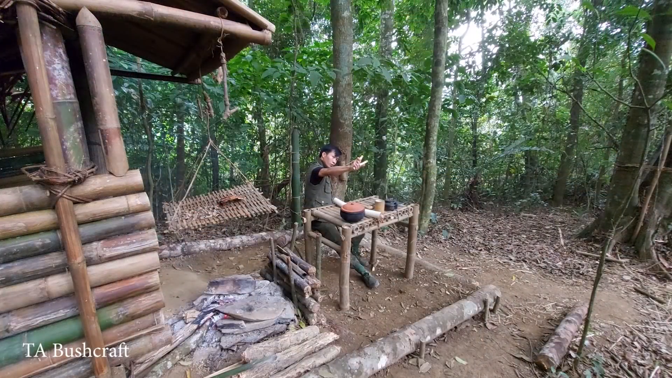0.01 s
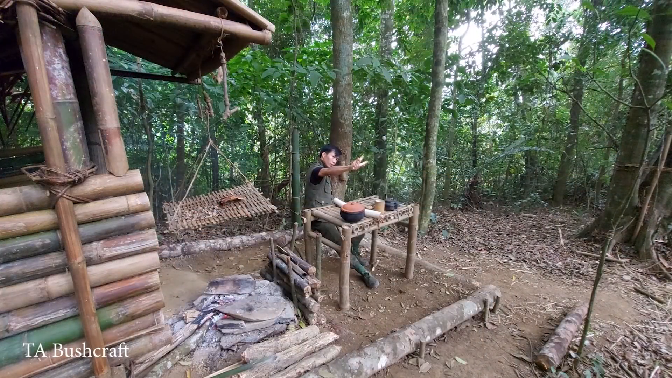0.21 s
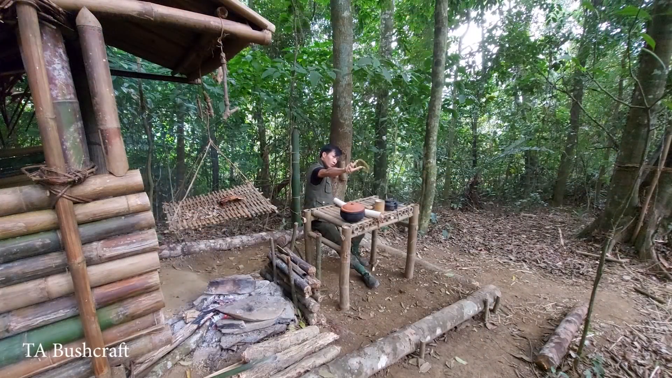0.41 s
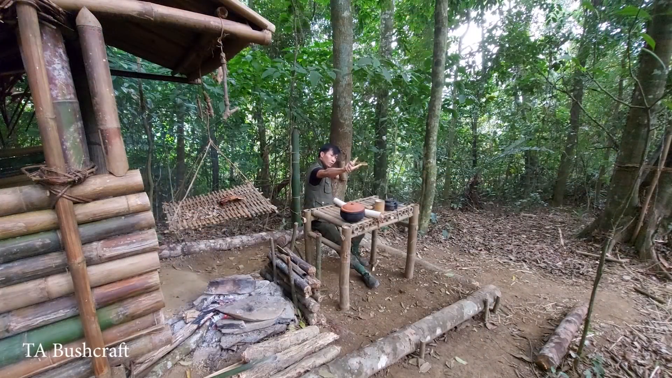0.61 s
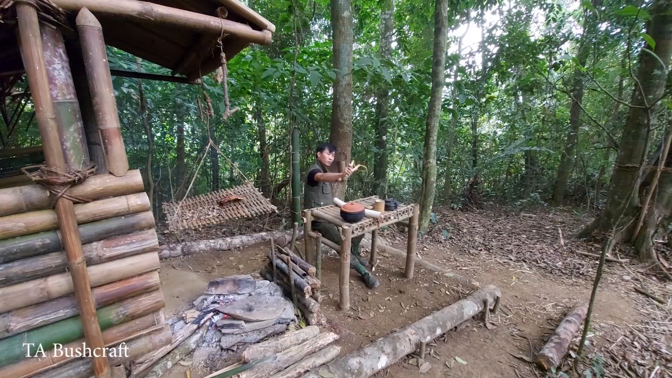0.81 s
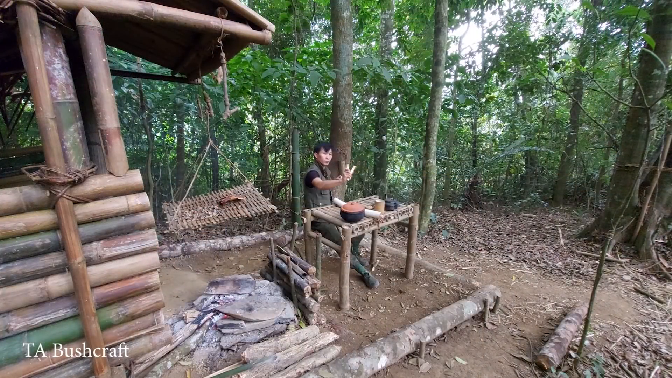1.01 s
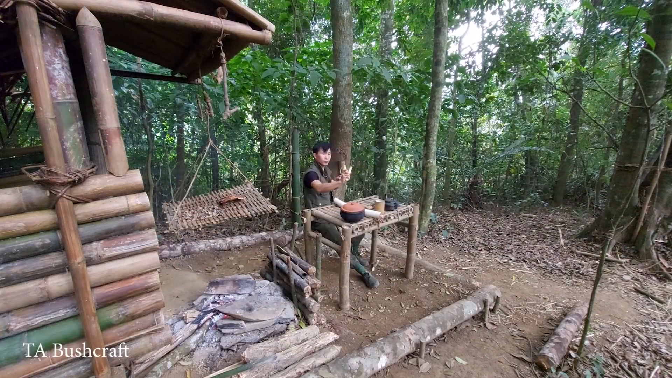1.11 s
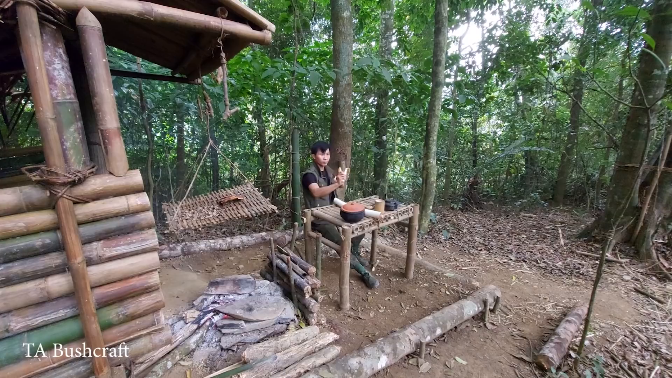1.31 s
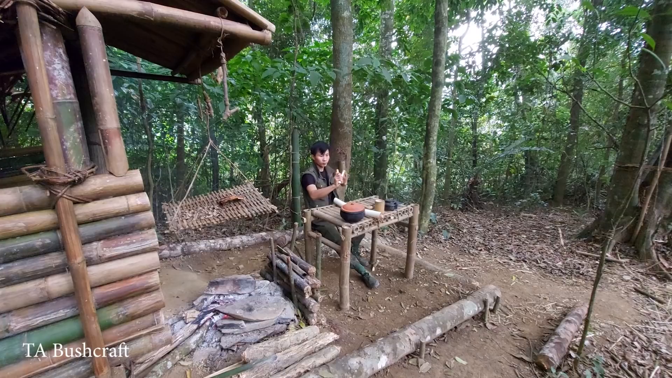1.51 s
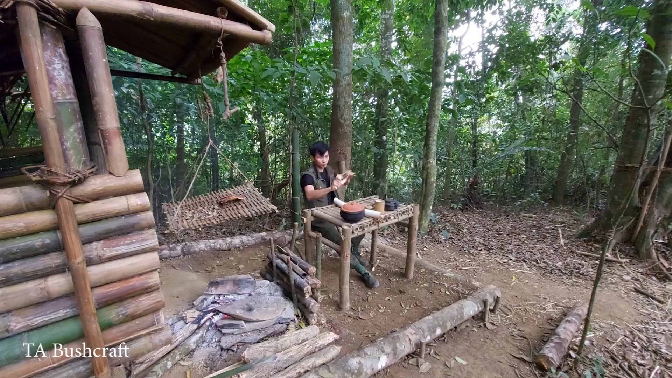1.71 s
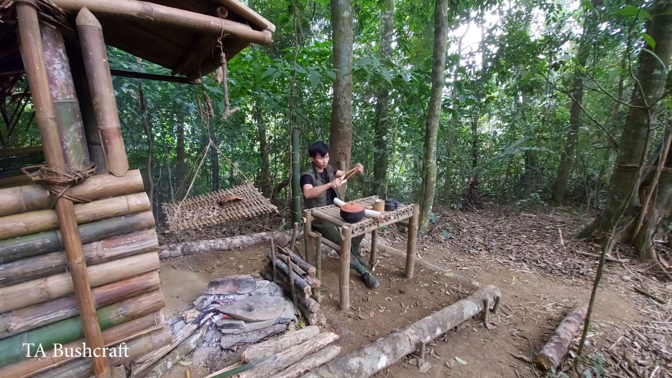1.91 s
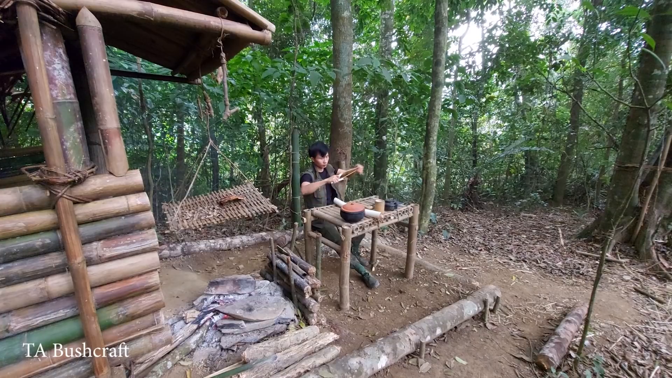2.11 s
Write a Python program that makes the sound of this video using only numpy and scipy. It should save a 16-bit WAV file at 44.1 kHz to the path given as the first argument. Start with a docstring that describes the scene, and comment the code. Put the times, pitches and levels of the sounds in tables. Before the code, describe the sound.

A slingshot's bands whip forward and slap with one very loud, dry crack close to the microphone, then a bright scatter off trees fades into quiet forest with thin insect drone, faint bird hoots and tiny pellet clinks.

```python
"""One slingshot shot in a forest camp: the bands whip forward, slap with a crack and flap slack.
Shaped noise bursts make the rush and crack, damped sines the flap, slowly fading noise the trees' answer.
Afterwards the next pellet is picked up with a few faint clinks: short noise bursts at narrow resonances.
Insects drone near 5 kHz as narrow noise, one rasps briefly, and a far bird repeats three gliding-sine hoots.
"""
import sys
import numpy as np
from scipy import signal
from scipy.fft import rfft, irfft, next_fast_len
from scipy.io import wavfile
from scipy.ndimage import map_coordinates

SR = 44100
rng = np.random.default_rng(int(sys.argv[2]) if len(sys.argv) > 2 else 0)


def wav_record(signal):
    """Record a signal, one row per channel, as 16-bit PCM in the file named by sys.argv[1]."""
    frames = np.transpose(np.atleast_2d(signal))
    bounded = np.clip(frames, -1, 1)
    # unit amplitude maps onto the largest positive 16-bit level
    quanta = np.round(bounded * 32767).astype(np.int16)
    wavfile.write(sys.argv[1], SR, quanta)


N = 97020

# Spectrum of the quiet air: columns f/Hz, relative level/dB
AIR_SPECTRUM = [(20, -29.5), (40, -4), (65, -1), (140, -1.5), (200, -6), (320, -4.5), (600, -9.5),
                (1100, -14), (2000, -16.5), (3400, -20), (4400, -13.5), (6000, -17.5), (7400, -23.5),
                (10500, -11), (13000, -13.5), (15800, -17.5)]
# Left-right likeness of the air: columns f/Hz, correlation/1
AIR_LIKENESS = [(60, .2), (300, 0.35), (1200, 0.0072)]
# Stereo balance of the air: columns f/Hz, left minus right/dB
AIR_BALANCE = [(2000, 1), (5000, 0), (10000, 2.5), (15000, 3.5)]
# Loudness contour of the rasping insect: columns t/s, level/dB
RASP_CONTOUR = [(1.368, -89.5), (1.405, -64.5), (1.441, -59), (1.53, -61.5), (1.65, -69.5), (1.78, -77),
                (1.9, -96)]
# Spectrum of the rasp: columns f/Hz, relative level/dB
RASP_SPECTRUM = [(4500, -51.5), (5400, -8), (6000, -0.5), (6800, -0.5), (7200, -36.5), (9000, -59.5)]
# Phrases of the bird: columns t/s, level relative to the notes/dB
BIRD_PHRASES = [(0.12, 0.5), (.767, 0.5), (1.412, 0), (2.073, 0)]
# Notes of a phrase: columns delay t/s, length t/s, start f/Hz, end f/Hz, level/dB
HOOT_NOTES = [(0, 0.039, 837, 765, -61), (.072, .046, 932.4, 776.2, -54.5), (.148, .05, 930, 773, -54)]
# Colour of the hoots' echo: columns f/Hz, gain level/dB
HOOT_ECHO_COLOUR = [(750, -2.5), (820, 0), (900, 5.5)]
# Spectrum of the bands rushing forward: columns f/Hz, relative level/dB
WHIP_SPECTRUM = [(100, -10.5), (300, 1), (480, -6.5), (780, 8), (1200, -7.5), (1900, -21), (2800, -7.5),
                 (3800, -14.5), (5000, -6), (7300, -18), (11000, -2.5), (15500, -11)]
# Spectrum of the crack: columns f/Hz, relative level/dB
CRACK_SPECTRUM = [(150, -27.5), (330, -8.5), (490, -9.5), (700, 0.5), (950, -7.5), (1170, -1.5),
                  (1650, -21), (2250, -6.5), (2730, 2), (3500, -13.5), (4200, -6), (4650, -6.5),
                  (5150, -0.5), (6000, 2), (7400, -14), (8600, -5), (11000, -6.5), (15000, -8.5)]
# Left-right likeness of the direct shot: columns f/Hz, correlation/1
CRACK_LIKENESS = [(400, .98), (1500, 1), (5000, 0.64), (11000, .55)]
# Treble snaps, the slap then its first returns from nearby surfaces: columns delay after slap t/s, level/dB
SLAP_SNAPS = [(.0003, -2), (.0034, -8), (.0094, -13.5), (.014, -17)]
# Spectrum of each snap: columns f/Hz, relative level/dB
SNAP_SPECTRUM = [(2000, -25), (4200, -6), (5600, 1.5), (7400, -10), (9000, -2), (11000, 0), (15000, -1)]
# Modes of flapping bands, pouch and wooden fork: columns delay after slap t/s, f/Hz, level/dB, T60 t/s
FLAP_MODES = [(0.0017, 90, -13, .06), (.0025, 125, -25, 0.11), (.002, 315, -15, 0.039),
              (.0005, 630, -14, 0.02), (0.00098, 790, -12.5, .025), (0.0011, 1170, -19.5, .025)]
# Starting spectrum of the crack scattered by ground, hut and trees: columns f/Hz, relative level/dB
SCATTER_SPECTRUM = [(35, -40.5), (70, -12.5), (120, -9), (180, -18), (250, -10.5), (315, -3.5),
                    (380, -14.5), (440, -10.5), (520, -13.5), (660, -8), (850, -9), (950, -15),
                    (1150, -11.5), (1500, -14), (1950, -9), (2300, -11), (2700, 0.5), (3250, -11.5),
                    (4100, -5), (6000, -8), (7200, -10), (9000, -3.5), (10700, 0), (13200, -2), (15500, -7)]
# Decay of the scattered crack: columns f/Hz, T60 t/s
SCATTER_DECAY = [(80, .2), (300, .26), (900, 0.32), (2500, .34), (5000, 0.41), (10000, .35), (15500, .32)]
# Left-right likeness of the diffuse forest: columns f/Hz, correlation/1
FOREST_LIKENESS = [(80, .95), (400, 0.56), (900, .45), (2000, 0.061), (8000, 0.095)]
# Spectrum of the answer from more distant trees: columns f/Hz, relative level/dB
LATE_SPECTRUM = [(1500, -22.5), (2300, -15), (2750, -3), (3300, -7.5), (4200, -1), (6000, 0), (7500, -4.5),
                 (10000, 0), (13000, -4), (15500, -8)]
# Pellet clinks: columns t/s, level/dB, ring f/Hz, click relative to ring level/dB, echo level/dB
PELLET_CLINKS = [(1.408, -56.5, 10900, -4, -18), (1.565, -58, 9830, 4, 3.5), (1.696, -66, 10160, -4, -16),
                 (1.963, -54, 9730, -3.5, 2.5), (2.193, -45.5, 9690, -12.5, 7)]
# Spectrum of jostled pellets, also of each click: columns f/Hz, relative level/dB
RATTLE_SPECTRUM = [(2000, -15.5), (3500, -11), (6000, -2), (8000, -7.5), (9800, -2.5), (12000, -3),
                   (15500, -4.5)]
# Narrow rings within the rattle: columns f/Hz, level relative to the rattle/dB
RATTLE_RESONANCES = [(3780, -5), (9850, -13)]

# Resonance widths are taken between the half-amplitude points; T60 is the time to fall by 60 dB.
AIR_DB = -63
DRONE_HZ, DRONE_WIDTH_HZ, DRONE_DB = 5099, 580, -64
DRONE_FLUTTER_DB, INSECT_PAN_DB = 0.5, -1  # pan: left minus right
HOOT_FALL, HOOT_PEAK_LATE = 2.3, 1.3  # exponents: glide curvature, delay of the loudness peak
HOOT_WET_DB, HOOT_ROOM_T60_S = -3.5, 0.5

SHOT_S = 0.2461  # the bands slap
PORT_LAG_S = 0.000045  # the direct sound reaches the right microphone port first
WHIP_LEAD_S, WHIP_RISE_S, WHIP_DB = 0.0062, 0.0026, -20
CRACK_DB, CRACK_RISE_S, CRACK_HOLD_S, CRACK_T60_S = -2.5, 0.00089, 0.0014, 0.027
SNAP_RISE_S, SNAP_HOLD_S, SNAP_T60_S = 0.00027, 0.0008, 0.012
FLAP_RISE_S = 0.001
SCATTER_DB, SCATTER_RISE_S = -9.5, 0.005
RING_HZ, RING_WIDTH_HZ, RING_DB, RING_T60_S = 2640, 280, -28.5, 0.45  # the slap's strongest resonance
LATE_DB, LATE_RISE_S, LATE_T60_S = -40.5, 0.12, 0.834

RATTLE_S, RATTLE_DB, RATTLE_RISE_S, RATTLE_T60_S = 1.563, -57.5, 0.0092, 0.336
CLINK_WIDTH_HZ, CLINK_RISE_S, CLINK_T60_S = 230, 0.001, 0.069
CLINK_PAN_DB, CLINK_ROOM_T60_S = 6, 0.41

LOW_CUT_HZ, CLIP_TOP = 38, 1.05
TOP_HZ, TOP_SLOPE_HZ = 16100, 500  # upper band limit and the width of its slope


def amp(db):
    """Level: an amplitude ratio is ten to the power of decibels over twenty."""
    return 10 ** (np.asarray(db) / 20)


def pan(db):
    """Level difference: the two channels' gains differ by db, left minus right."""
    return amp([[db / 2], [-db / 2]])


def unit(x):
    """Normalisation: division by the root mean square gives unit power."""
    return x / np.sqrt(np.mean(x ** 2) + 1e-20)


def along(points, hz):
    """Logarithmic frequency scale: (f, value) points are interpolated along log f."""
    f, value = np.transpose(points)
    return np.interp(np.log(hz + 1), np.log(f + 1), value)


def since(s):
    """Causality: seconds elapsed since s, zero before it."""
    return np.maximum(np.arange(N) / SR - s, 0)


def burst(s, rise, t60, hold=0):
    """Exponential damping: an envelope with linear rise, hold, then constant loss in dB per second."""
    attack = np.minimum(since(s) / rise, 1)
    return attack * amp(-60 * since(s + rise + hold) / t60)


def filtered(x, response):
    """Linear filtering: the spectrum is multiplied by a frequency response."""
    m = next_fast_len(N + SR // 2)  # zero padding
    hz = np.fft.rfftfreq(m, 1 / SR)
    return irfft(rfft(x, m) * response(hz), m)[..., :N]


def colour(points):
    """Spectral shaping: a frequency response drawn through (f/Hz, level/dB) points."""
    return lambda hz: amp(along(points, hz))


def resonance(centre_hz, width):
    """Resonance: the response peaks at the centre and falls steeply on both sides."""
    return lambda hz: 1 / (1 + ((hz - centre_hz) / (width / 2)) ** 2)


def noise(response, alike=FOREST_LIKENESS):
    """Interchannel correlation: mid and side noises are mixed to a given likeness, with rms 1."""
    def mid_side(hz):
        turn = np.arccos(np.clip(along(alike, hz), -1, 1)) / 2
        return response(hz) * np.array([np.cos(turn), np.sin(turn)])

    mid, side = filtered(rng.standard_normal((2, N)), mid_side)
    return unit(np.array([mid + side, mid - side]))


def echo(x, t60):
    """Diffuse scattering: convolution with a decaying noise tail, scaled to unit energy on the left."""
    tail = noise(np.ones_like) * burst(0, 0.0083, t60)
    tail = tail / np.linalg.norm(tail[0])
    return signal.fftconvolve(np.atleast_2d(x), tail, axes=1)[:, :N]


def air():
    """Steady background noise: coloured noise whose stereo balance varies with frequency."""
    def balance(hz):
        return amp(along(AIR_BALANCE, hz) * np.array([[0.5], [-0.5]]))

    return filtered(amp(AIR_DB) * noise(colour(AIR_SPECTRUM), AIR_LIKENESS), balance)


def insects(flutter_rate=40):
    """Narrow-band noise: a blurred chorus flutters in level; a higher noise band makes one brief rasp."""
    # random values at flutter_rate per second, smoothly interpolated
    flutter_points = rng.standard_normal(int(N * flutter_rate / SR) + 4)
    flutter = map_coordinates(flutter_points, [np.arange(N) * flutter_rate / SR])
    drone_gain = amp(DRONE_DB + DRONE_FLUTTER_DB * flutter)
    drone = drone_gain * noise(resonance(DRONE_HZ, DRONE_WIDTH_HZ))

    rasp_gain = amp(np.interp(since(0), *np.transpose(RASP_CONTOUR)))
    rasp = rasp_gain * noise(colour(RASP_SPECTRUM))
    return (drone + rasp) * pan(INSECT_PAN_DB)


def bird():
    """Frequency glide: integrating a falling pitch gives the phase of each pure hoot, echoed by the forest."""
    song = np.zeros(N)
    for s, phrase_db in BIRD_PHRASES:
        for delay, length, start_hz, end_hz, db in HOOT_NOTES:
            u = np.minimum(since(s + delay) / length, 1)  # progress through the note
            pitch = end_hz + (start_hz - end_hz) * (1 - u) ** HOOT_FALL
            swell = np.sin(np.pi * u ** HOOT_PEAK_LATE)
            tone = np.sin(2 * np.pi * np.cumsum(pitch) / SR)
            song += amp(phrase_db + db) * swell * tone
    wet = echo(filtered(song, colour(HOOT_ECHO_COLOUR)), HOOT_ROOM_T60_S)
    return song + amp(HOOT_WET_DB) * wet


def whip():
    """Turbulence: the bands rush forward just before the slap, as a swelling burst of noise."""
    envelope = burst(SHOT_S - WHIP_LEAD_S, WHIP_RISE_S, CRACK_T60_S, WHIP_LEAD_S - WHIP_RISE_S)
    # squaring bends the rise upward and halves the decay time
    return amp(WHIP_DB) * noise(colour(WHIP_SPECTRUM), CRACK_LIKENESS) * envelope ** 2


def crack():
    """Impact: the slap and its puff of air give a broadband burst with a very short decay."""
    envelope = burst(SHOT_S, CRACK_RISE_S, CRACK_T60_S, CRACK_HOLD_S)
    return amp(CRACK_DB) * noise(colour(CRACK_SPECTRUM), CRACK_LIKENESS) * envelope


def snaps():
    """Early reflection: the bright edge of the slap is followed by its first, weaker returns."""
    out = 0
    for delay, db in SLAP_SNAPS:
        envelope = burst(SHOT_S + delay, SNAP_RISE_S, SNAP_T60_S, SNAP_HOLD_S)
        out = out + amp(db) * noise(colour(SNAP_SPECTRUM), CRACK_LIKENESS) * envelope
    return out


def flap():
    """Modal vibration: bands, pouch and knocked fork ring as a sum of damped sines."""
    out = np.zeros(N)
    for delay, hz, db, t60 in FLAP_MODES:
        start = SHOT_S + delay
        out += amp(db) * np.sin(2 * np.pi * hz * since(start)) * burst(start, FLAP_RISE_S, t60)
    return out


def slingshot():
    """Superposition: whip, crack, snaps and flap add, and the path difference delays the left channel."""
    left, right = whip() + crack() + snaps() + flap()
    return np.array([np.roll(left, round(PORT_LAG_S * SR)), right])


def scatter():
    """Reverberation: the near wash decays at its own rate per band; a resonance and far trees linger."""
    hz, t, bands = signal.stft(noise(colour(SCATTER_SPECTRUM)), SR, nperseg=512)
    fade = amp(-60 * np.maximum(t - SHOT_S, 0) / along(SCATTER_DECAY, hz)[:, None])
    wash = signal.istft(bands * fade, SR, nperseg=512)[1][:, :N]
    wash = wash * np.minimum(since(SHOT_S) / SCATTER_RISE_S, 1)
    ring = noise(resonance(RING_HZ, RING_WIDTH_HZ)) * burst(SHOT_S, SCATTER_RISE_S, RING_T60_S)
    late = noise(colour(LATE_SPECTRUM)) * burst(SHOT_S, LATE_RISE_S, LATE_T60_S)
    return amp(SCATTER_DB) * wash + amp(RING_DB) * ring + amp(LATE_DB) * late


def rattle():
    """Multiple impact: jostled pellets give broad noise and narrow rings under one decay."""
    body = noise(colour(RATTLE_SPECTRUM))
    for hz, db in RATTLE_RESONANCES:
        body = body + amp(db) * noise(resonance(hz, CLINK_WIDTH_HZ))
    return amp(RATTLE_DB) * body * burst(RATTLE_S, RATTLE_RISE_S, RATTLE_T60_S)


def clinks():
    """Impact of small hard bodies: each clink joins a narrow ring to a broad click, and echoes."""
    out = np.zeros((2, N))
    for s, db, hz, click_db, wet_db in PELLET_CLINKS:
        ring = noise(resonance(hz, CLINK_WIDTH_HZ))
        click = amp(click_db) * noise(colour(RATTLE_SPECTRUM))
        clink = amp(db) * burst(s, CLINK_RISE_S, CLINK_T60_S) * (ring + click)
        out += clink * pan(CLINK_PAN_DB) + amp(wet_db) * echo(clink, CLINK_ROOM_T60_S)
    return out


def scene():
    """Superposition: the shot and the pellets add to the quiet forest."""
    return air() + insects() + bird() + slingshot() + scatter() + clinks() + rattle()


def record(dry):
    """Band limiting and overload: deep bass is cut, peaks are clipped, and the top band is removed."""
    high_pass = signal.butter(2, LOW_CUT_HZ, "highpass", fs=SR, output="sos")
    thinned = signal.sosfilt(high_pass, dry)
    clipped = np.clip(thinned, -CLIP_TOP, CLIP_TOP)

    def band_limit(hz):
        return np.sin(np.pi / 2 * np.clip((TOP_HZ - hz) / TOP_SLOPE_HZ, 0, 1)) ** 2

    return filtered(clipped, band_limit)


dry = scene()
out = record(dry)
wav_record(out)
```